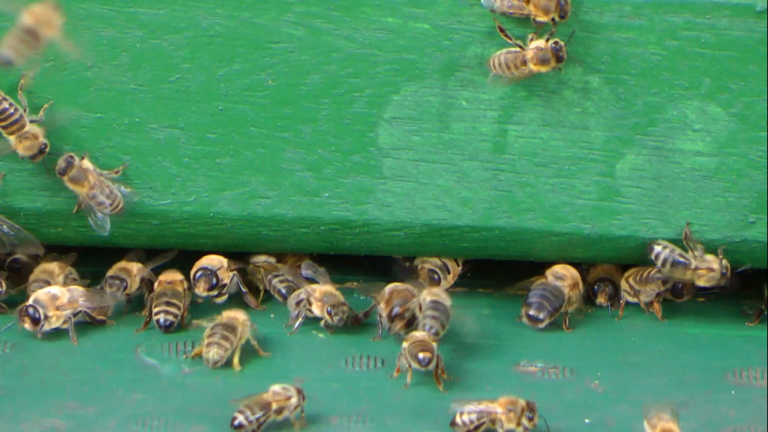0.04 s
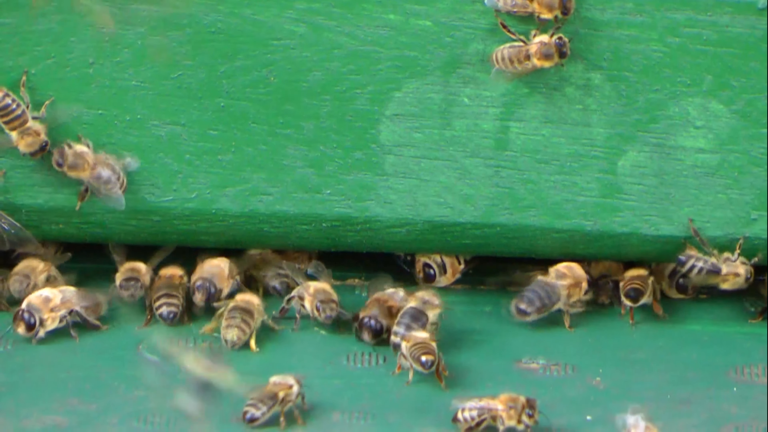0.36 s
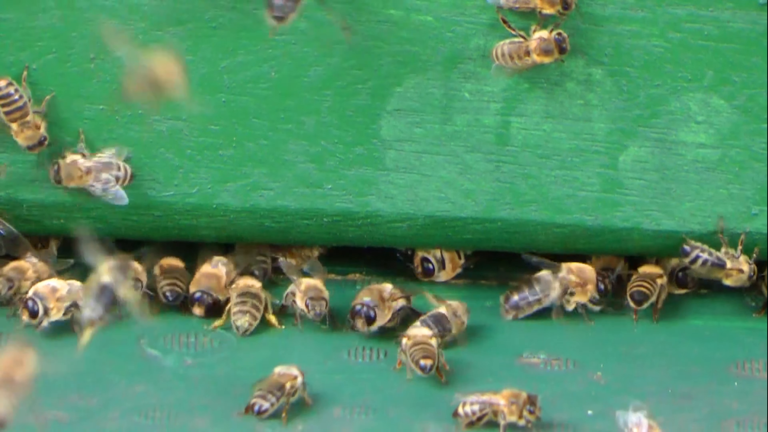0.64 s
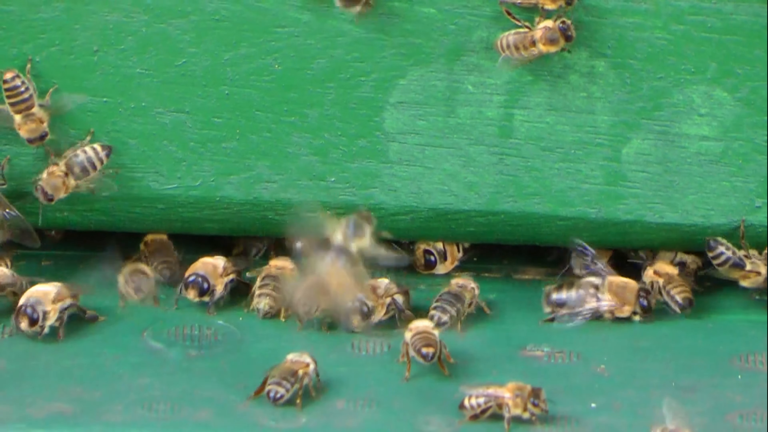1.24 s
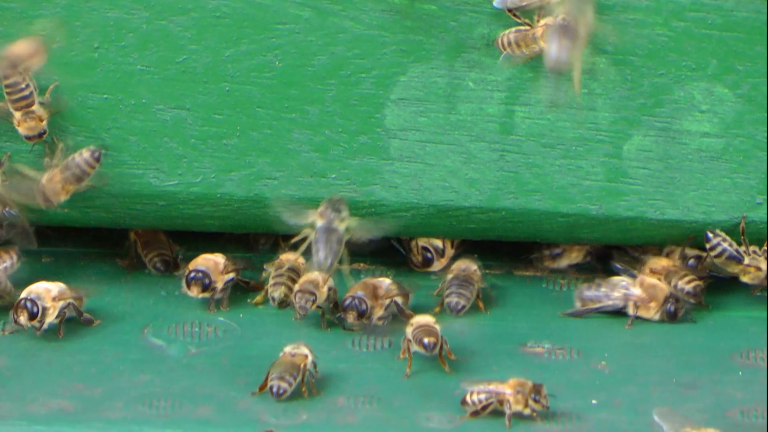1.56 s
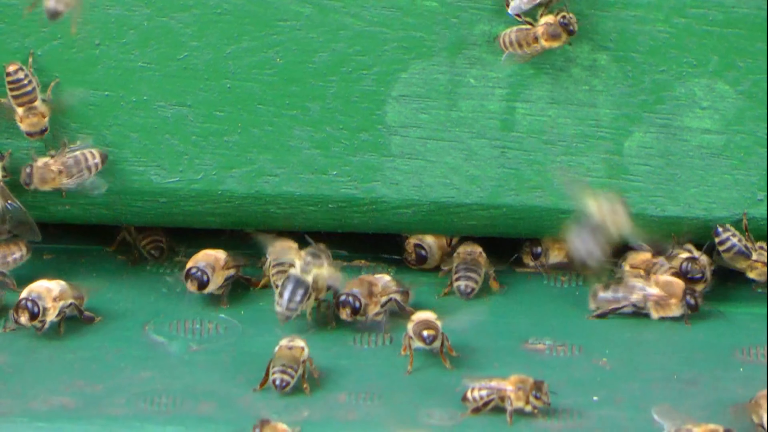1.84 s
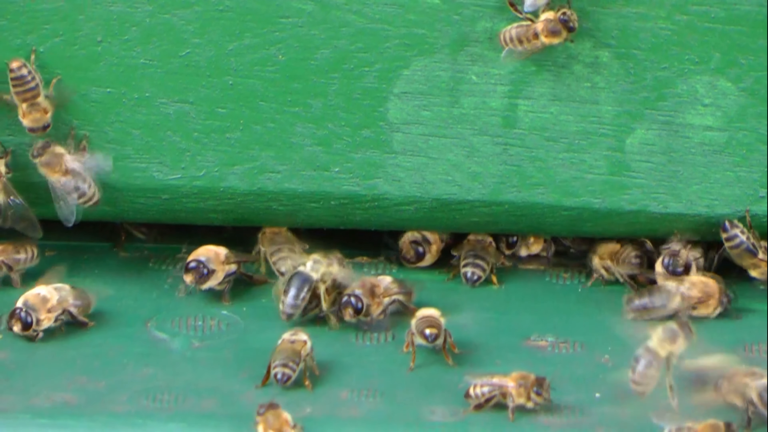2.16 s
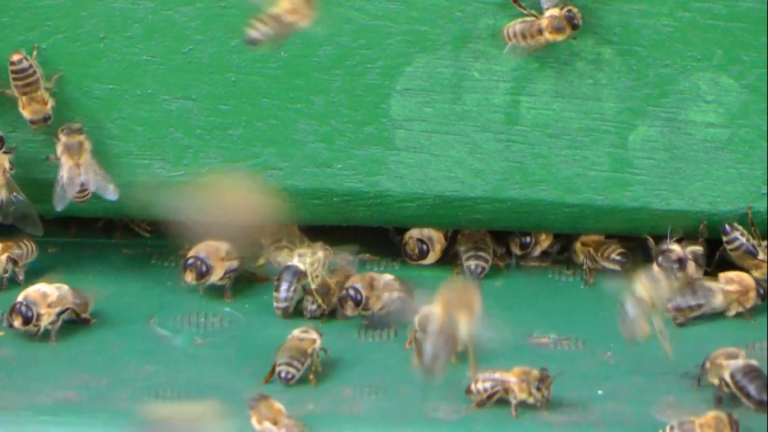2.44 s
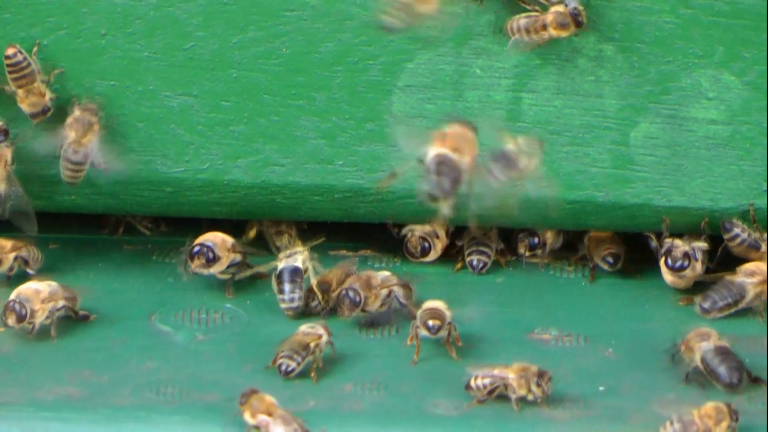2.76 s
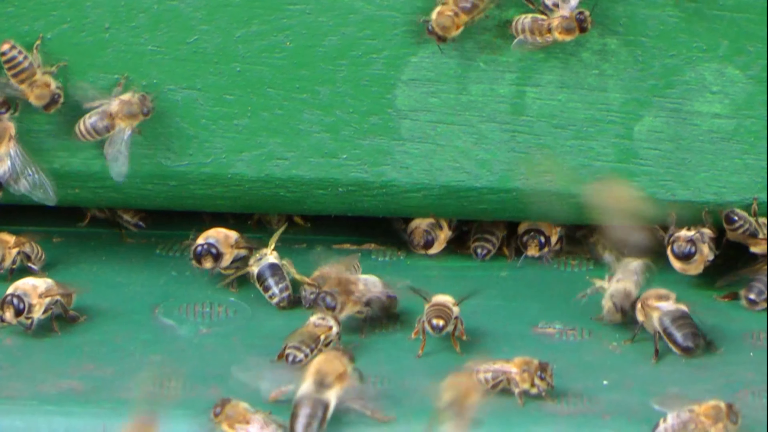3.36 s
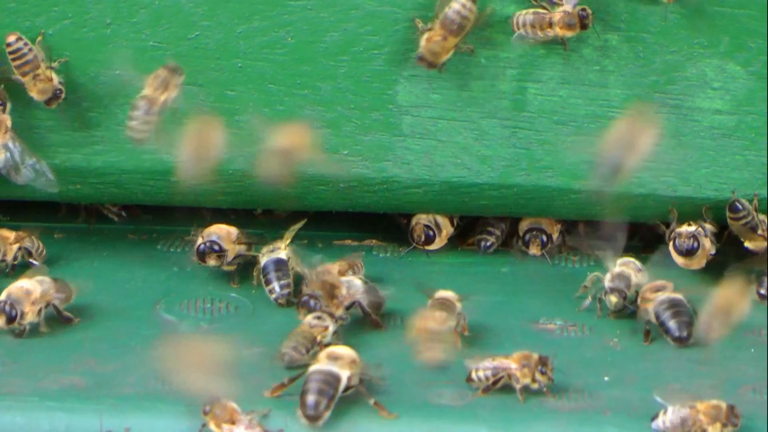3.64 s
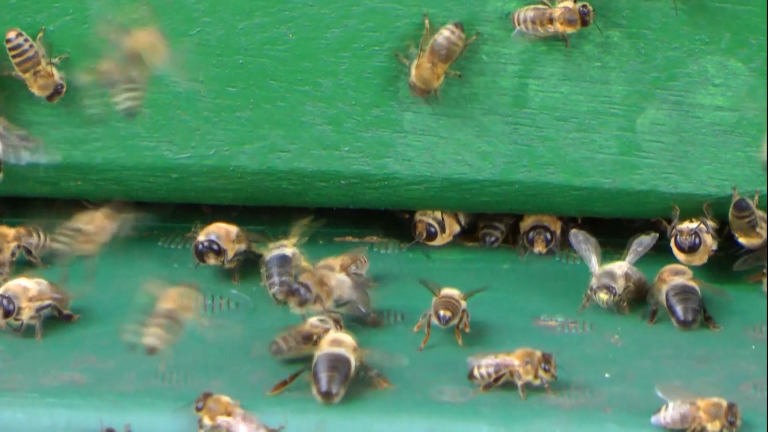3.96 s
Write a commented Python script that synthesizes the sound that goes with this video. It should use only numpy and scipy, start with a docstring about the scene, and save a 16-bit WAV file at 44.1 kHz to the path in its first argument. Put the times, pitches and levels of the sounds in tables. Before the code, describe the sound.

A thick hum of many honeybees runs for the whole four seconds, close to a hive entrance outdoors. Single bees repeatedly swell past, notably around 2.4, 3.1 and 3.7 seconds. One tiny tick comes at 0.3 seconds. Wings softly puff on the microphone near 1.3, 1.5 and 2.7 seconds, and the landing board rustles faintly now and then. Low rumble, light breeze and even hiss lie underneath.

```python
"""A thick hum of honeybees crowding a hive entrance outdoors, close to the microphone.
Dozens of wingbeats, each on its own wandering pitch, merge; single bees swing close and stand out.
The wings stir the air and puff on the microphone; the landing board rustles and ticks once.
Underneath lies a bed of low rumble, light breeze and even hiss."""
import sys
import numpy as np
from scipy import signal
from scipy.fft import rfft, irfft
from scipy.io import wavfile
from scipy.ndimage import map_coordinates

SR = 44100
rng = np.random.default_rng(int(sys.argv[2]) if len(sys.argv) > 2 else 0)


def pcm_store(signal):
    """Save signal as 16-bit PCM."""
    levels = np.round(np.clip(np.atleast_2d(signal), -1, 1) * 32767)
    wavfile.write(sys.argv[1], SR, levels.astype(np.int16).T)


N = 176400

# tone of a wingbeat's overtones: f/Hz, level/dB
WING_TONE = [(240, -10), (490, 1.5), (730, -8), (1000, -10), (1260, -12.5), (1550, -19), (1800, -21.5),
             (2200, -36.5), (3200, -33.5), (5000, -62)]
# bustle of the crowd: t/s, level/dB, pitch offset/Hz
BUSTLE = [(0, 2.5, 0), (.45, 1, -1), (.72, 1.5, -5), (1.2, 2.4, 1.5), (1.7, 0.9, 2), (1.952, 1, -3),
          (2.2, 1.6, 1), (2.451, 2.5, -3), (2.68, 1.4, 4), (2.93, 2, -1.5), (3.25, 0, 2), (3.6, 0.7, 0),
          (4, -1.4, -3.5)]
# stereo width of the crowd and its lean to the left: f/Hz, side level/dB
CROWD_WIDTH = [(200, -12), (260, -16), (400, -10.5), (500, -12.5), (750, -8), (1300, -9.5), (3000, -15)]
CROWD_LEAN = [(250, -32), (500, -27), (1000, -15), (2000, -12)]
# bees swinging close: t/s, length/s, wingbeat/Hz, fundamental/dB, overtones/dB, left minus right/dB
FLYBYS = [(0.315, 0.13, 238, -28.5, -31, 2.5), (0.475, 0.2, 241.4, -27, -30, 1.5),
          (0.541, 0.081, 250.6, -33, -27, -1), (0.729, 0.17, 235.3, -43, -26.5, 2),
          (1.161, 0.208, 240.4, -29, -30, 2.5), (1.36, 0.18, 257.3, -34, -32, 1.1),
          (1.496, 0.094, 243.6, -25.5, -29, -1.5), (1.957, 0.116, 238.7, -32, -25.5, 1.5),
          (2.1, 0.09, 250, -29, -37, 3), (2.38, .2, 246, -24.5, -33.5, .8),
          (2.668, 0.18, 255.4, -30, -26, .4), (2.866, 0.12, 236.1, -28, -33, -2),
          (3.068, .1, 251, -21.5, -33, -0.5), (3.242, .16, 254.4, -29.5, -26, 3),
          (3.411, 0.083, 252.7, -35, -26.5, -2), (3.579, 0.068, 249, -26, -26, 1),
          (3.7, 0.15, 231.3, -25, -28, 1), (3.785, 0.24, 259.5, -26, -36, -3.5)]
# tone of stirred air and of wing wash on the microphone: f/Hz, level/dB
AIR_TONE = [(60, -39), (150, -5), (330, -0.5), (600, -8), (1100, -5.5), (1700, -10.5), (2500, -35),
            (6000, -47), (12000, -57)]
PUFF_TONE = [(30, -34), (70, 13), (95, 19), (130, 12), (300, -37), (2000, -75)]
# puffs of wing wash: t/s, length/s, level/dB
PUFFS = [(1.256, .11, -32), (1.535, 0.074, -35), (2.363, 0.08, -38), (2.732, 0.036, -29)]
# wings and legs brushing the board: t/s, length/s, level/dB
SCUFFS = [(.59, 0.089, -49), (1.255, 0.22, -35), (1.868, 0.043, -35), (2.046, .07, -37), (2.34, 0.18, -40),
          (3.19, .15, -40)]
# tone of that brushing: f/Hz, level/dB
SCUFF_TONE = [(500, -17), (1400, 0), (4000, 5), (7000, 3), (10000, -1.5), (16000, -5)]
# contacts of one tick on the board: t/s, f/Hz, level/dB
TICK_CONTACTS = [(0.2689, 3900, -12), (0.2708, 4100, -26), (0.271, 5900, -21)]
# tone of the outdoor bed's layers: f/Hz, level/dB
RUMBLE_TONE = [(20, -48), (32, -30), (41, -1.5), (48, 5), (57, -17), (75, -10), (95, -4), (120, -18),
               (170, -16), (400, -46), (3000, -70)]
BREEZE_TONE = [(20, -2.5), (60, 10), (100, -5), (160, -10.5), (300, -3), (1000, -49), (5000, -80)]
HISS_TONE = [(300, 5.5), (2000, 1), (4000, 0.43), (5500, -0.25), (7000, 1), (9000, -1.5), (12000, -2.5),
             (16000, -3.7)]
# rise and fall of the breeze: t/s, level/dB
GUSTS = [(0, -36), (.6, -52), (.8, -39), (1.05, -43), (1.9, -40), (2.3, -31), (2.72, -37.5), (2.9, -45),
         (3.12, -35), (3.4, -44), (4, -44)]
# stereo width of the hiss: f/Hz, side level/dB
HISS_WIDTH = [(2000, -9.5), (4500, -13.5), (8800, -12), (9800, -38), (16000, -56)]

WANDER, WANDER_RATE = .026, 4.5  # slow drift: share of pitch, changes per s
FLUTTER, FLUTTER_RATE = 0.005986, 30  # fast jitter: share of pitch, changes per s
DISTANCE_DB, TURN_DB, MOVE_RATE = 2, -0.5, 5.014  # swings as a bee moves and turns; changes per s


def wingbeat(hz, base_hz, harmonics=20, size=4096):
    """Beating wings: one cycle looped along a pitch curve, as fundamental and overtones."""
    k = np.arange(2, harmonics + 1)
    spectrum = np.zeros(size // 2 + 1, complex)
    spectrum[k] = gain_at(WING_TONE, k * base_hz) * np.exp(2j * np.pi * rng.random(len(k)))
    overtone_cycle = irfft(spectrum) * size / 2
    beats = np.cumsum(hz) / SR + rng.random()
    index = (beats * size).astype(int) % size
    return np.sin(2 * np.pi * index / size), overtone_cycle[index]


def crowd(centre_hz, spread_hz, count):
    """Bees on both sides wander in pitch and distance; turning trades fundamental against overtones."""
    mid, side = 0, 0
    rank = (np.arange(count) + .5) / count
    offsets = np.log(rank / (1 - rank)) * np.sqrt(3) / np.pi  # pitches bunch around the centre
    for k, offset in enumerate(offsets):
        own_hz = centre_hz + spread_hz * offset
        drift = 1 + WANDER * walk(WANDER_RATE) + FLUTTER * walk(FLUTTER_RATE)
        fundamental, overtones = wingbeat(own_hz * drift, own_hz.mean())
        facing = undb(TURN_DB * walk(MOVE_RATE) / 2)
        nearness = undb(DISTANCE_DB * walk(MOVE_RATE))
        bee = (fundamental * facing + overtones / facing) * nearness
        mid += bee
        side += (-1) ** k * bee
    return stereo(unit(mid), colour(unit(side), CROWD_WIDTH) + colour(unit(mid), CROWD_LEAN))


def flybys(t, doppler=.015):
    """Single bees swell out of the hum, a little sharp on approach and flat on leaving."""
    out = np.zeros((2, N))
    for at, length, hz, fundamental_db, overtones_db, pan_db in FLYBYS:
        glide = 1 - doppler * np.tanh(2 * (t - at) / length) + FLUTTER * walk(FLUTTER_RATE)
        fundamental, overtones = wingbeat(hz * glide, hz)
        buzz = unit(fundamental) * undb(fundamental_db) + unit(overtones) * undb(overtones_db)
        out += pan(buzz * swell(t, at, length), pan_db)
    return out


def wing_wash(t, rush_db=-35, side_db=-9):
    """A rush of stirred air, with soft, low puffs when a bee fans the microphone."""
    air = stereo(noise(AIR_TONE), undb(side_db) * noise(AIR_TONE))
    puffs = swells(t, PUFFS) * noise(PUFF_TONE)
    return undb(rush_db) * pan(air, db=2.4) + puffs


def board_rustle(t, grains_per_s=220, grain_db=3.5):
    """Grainy scuffs of wings and legs as bees land and jostle."""
    grains = np.interp(t * grains_per_s, np.arange(2048), rng.standard_normal(2048))
    texture = unit(noise(SCUFF_TONE) * undb(grain_db * grains))
    return pan(swells(t, SCUFFS) * texture, db=0.99)


def board_tick(t, rise_s=0.00037, decay_s=0.00081):
    """Three quick contacts on the board, each ringing for a few cycles, fuse into one tick."""
    out = 0
    for at, hz, db in TICK_CONTACTS:
        age = np.maximum(t - at, 0)
        attack = np.minimum(age / rise_s, 1)
        decay = np.exp(-np.maximum(age - rise_s, 0) / decay_s)
        out += undb(db) * attack * decay * np.sin(2 * np.pi * hz * age)
    return out


def outdoor_bed(t, rumble_db=-37.5, hiss_db=-30):
    """Low rumble, a breeze buffeting each microphone port separately, and a narrow, even hiss."""
    rumble = undb(rumble_db) * noise(RUMBLE_TONE)
    gusts = undb(np.interp(t, *np.array(GUSTS).T))
    breeze = gusts * np.array([noise(BREEZE_TONE), noise(BREEZE_TONE)])
    hiss = undb(hiss_db) * stereo(noise(HISS_TONE), colour(noise(HISS_TONE), HISS_WIDTH))
    return rumble + breeze + pan(hiss, db=0.2)


def undb(db):
    """Decibels to gain."""
    return 10 ** (np.asarray(db) / 20)


def unit(x):
    """Scale to rms 1."""
    return x / np.sqrt(np.mean(x ** 2))


def gain_at(curve, hz):
    """Gain of an EQ curve (f/Hz, level/dB) at hz."""
    f, db = np.array(curve, float).T
    return undb(np.interp(np.log(np.maximum(hz, 1)), np.log(f), db))


def colour(x, curve):
    """Shape a sound with an EQ curve."""
    return irfft(rfft(x) * gain_at(curve, np.arange(N // 2 + 1) * SR / N), N)


def noise(curve):
    """Coloured noise of rms 1."""
    return unit(colour(rng.standard_normal(N), curve))


def stereo(mid, side):
    """Left and right from mid and side."""
    return np.array([mid + side, mid - side])


def pan(x, db):
    """Place a sound left (+) or right (-)."""
    return x * undb(np.array([[db], [-db]]) / 2)


def walk(rate):
    """Smooth random modulation of spread about 1, changing rate times a second."""
    knots = rng.standard_normal(512)
    coarse = np.linspace(0, N, 1024)
    path = map_coordinates(knots, [coarse / SR * rate + rng.random()], order=3, mode="wrap")
    return np.interp(np.arange(N), coarse, path)


def swell(t, at, length):
    """Bell-shaped rise and fall."""
    return np.exp(-2 * ((t - at) / length) ** 2)


def swells(t, cues):
    """An envelope with one swell per cue."""
    return sum(undb(db) * swell(t, at, length) for at, length, db in cues)


def scene():
    """Flying and hovering bees ride the bustle; flybys, air and board sounds sit over the bed."""
    t = np.arange(N) / SR
    times, level_db, offset_hz = np.array(BUSTLE).T
    bustle = undb(np.interp(t, times, level_db))
    bend_hz = np.interp(t, times, offset_hz)
    flying = undb(-26) * crowd(250.74 + bend_hz, spread_hz=11.5, count=20)
    hovering = undb(-28.5) * crowd(217.84 + bend_hz, spread_hz=19, count=14)
    hum = bustle * (flying + hovering)
    return hum + flybys(t) + wing_wash(t) + board_rustle(t) + board_tick(t) + outdoor_bed(t)


def record(dry):
    """A quick fade-in after a moment of silence, then a steep high cut."""
    start_s, fade_s, cutoff_hz = 0.057, 0.014, 15900
    fade_in = np.clip((np.arange(N) / SR - start_s) / fade_s, 0, 1) ** 3
    high_cut = signal.ellip(12, .1, 70, cutoff_hz, fs=SR, output="sos")
    return signal.sosfilt(high_cut, dry * fade_in)


dry = scene()
out = record(dry)
pcm_store(out)
```